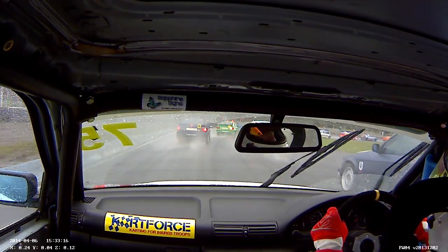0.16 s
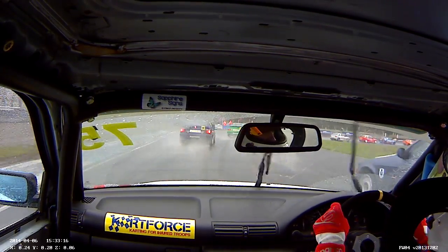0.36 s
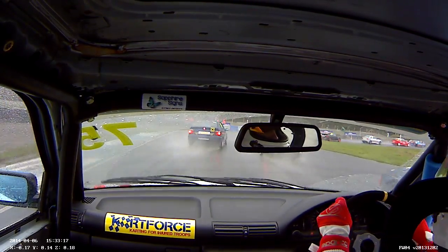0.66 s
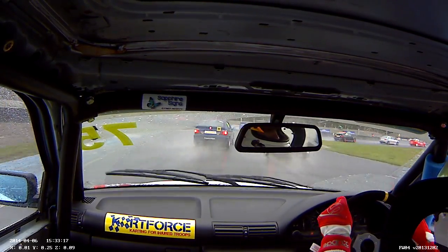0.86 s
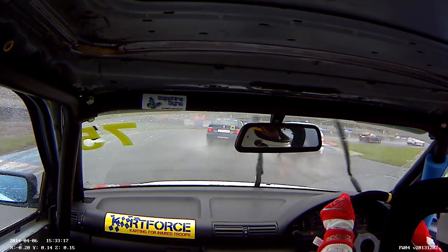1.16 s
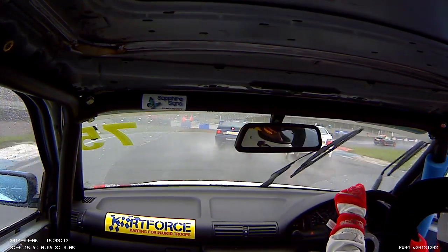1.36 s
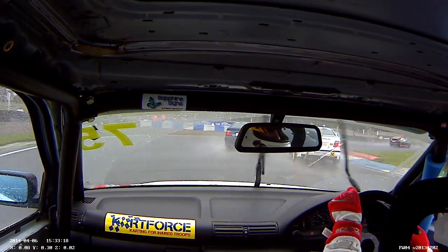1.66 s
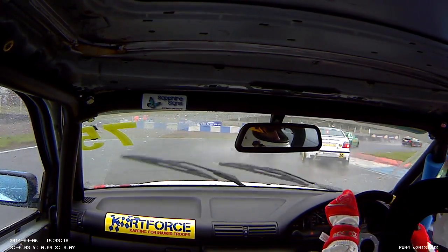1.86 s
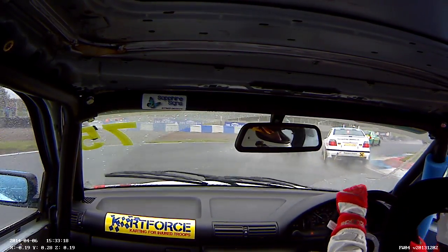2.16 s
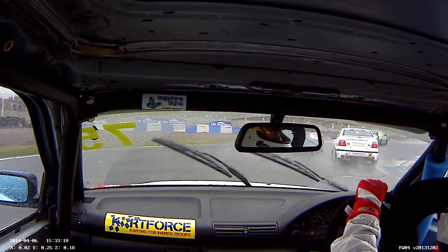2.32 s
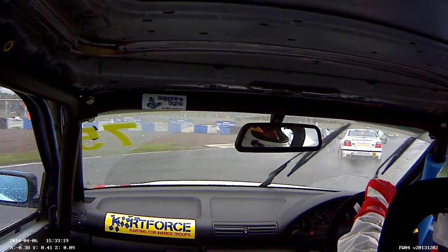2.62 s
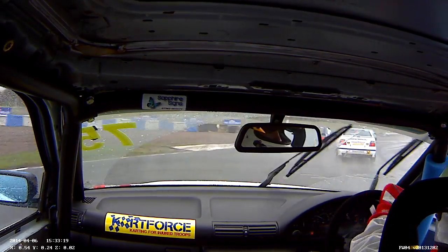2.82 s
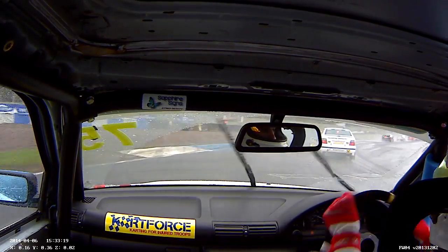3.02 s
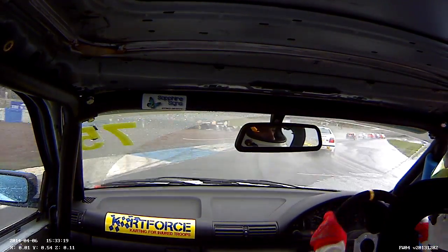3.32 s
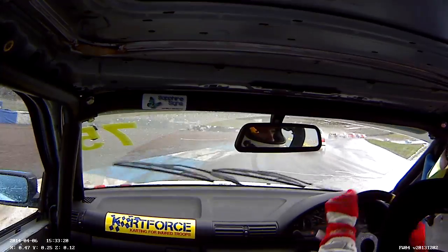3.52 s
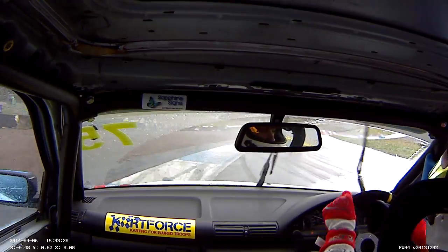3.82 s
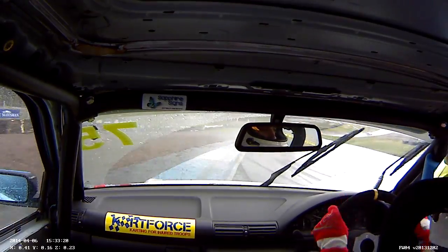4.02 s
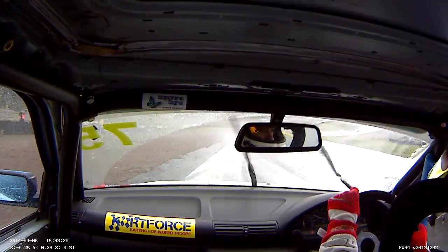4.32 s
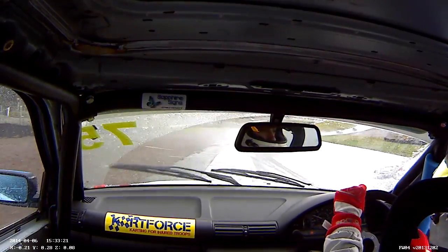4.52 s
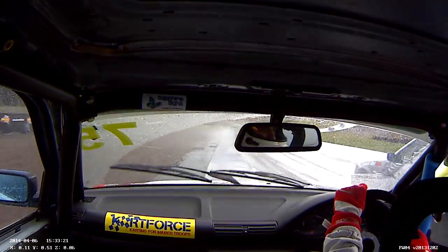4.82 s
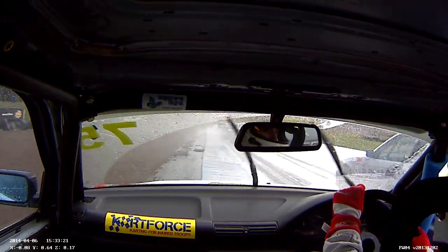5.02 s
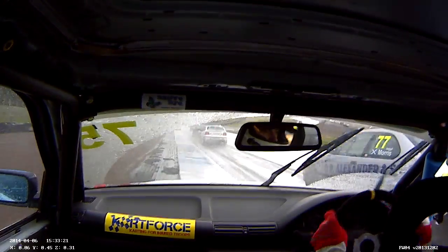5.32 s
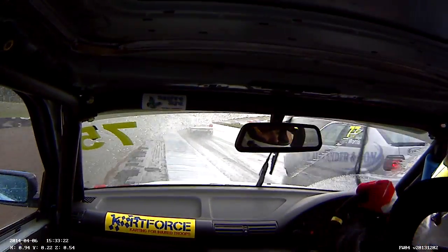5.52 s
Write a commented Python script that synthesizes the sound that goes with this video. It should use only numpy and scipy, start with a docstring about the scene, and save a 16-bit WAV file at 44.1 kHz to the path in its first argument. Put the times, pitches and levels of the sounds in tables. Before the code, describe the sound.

A race car engine slows and pulls away over rumbling, hissing wet tyres, heard from inside with knocks, rattles and sharp clicks.

```python
"""A racing engine drones over rumbling, hissing tyres, heard inside a stripped saloon on a wet circuit.
Its four cylinders slow into a bend, then pull away while a rival accelerates alongside and another car
drones further off. The road shakes the bare shell and the tyres fling water. Loose fittings rattle,
bumps knock the body, and near the end come several sharp clicks.
A small dashboard camera overloads on the loudest peaks."""
import sys
import numpy as np
from scipy import signal
from scipy.fft import rfft, irfft
from scipy.io import wavfile
from scipy.ndimage import uniform_filter1d

SR = 44100
rng = np.random.default_rng(int(sys.argv[2]) if len(sys.argv) > 2 else 0)


def to_wav(sig):
    """Store sig (one row per channel, or 1-D mono) as 16-bit WAV at the path in sys.argv[1].

    Samples outside -1..1 are clipped; the rate is SR.
    """
    pcm = np.clip(np.atleast_2d(sig), -1, 1) * 32767
    pcm = np.round(pcm).astype(np.int16)
    wavfile.write(sys.argv[1], SR, pcm.T)  # frames by channels


N = 250047

# How often our engine fires: it slows, holds, then climbs (time [s], firing rate [Hz])
FIRING_RATE = [(0.0, 151), (0.45, 139.6), (1.45, 120.5), (2.7, 99.37), (2.95, 90.8), (3.68, 89.2),
               (3.8, 99.1), (4.05, 98.1), (4.78, 107.6), (4.95, 115.7), (5.42, 126.2), (5.67, 139.3)]
CRUISE_HZ = 120  # the firing rate at cruising speed


def undb(db):
    """Turn decibels into a number to multiply by."""
    return 10 ** (np.asarray(db) / 20)


def unit(x):
    """Scale a signal to an average strength (rms) of 1."""
    return x / np.sqrt(np.mean(x ** 2))


def curve(table):
    """Join (time, value) points with straight lines, one value per sample."""
    return np.interp(np.arange(N) / SR, *np.transpose(table))


def colour(x, spectrum):
    """Shape a sound by (frequency [Hz], level [dB]) points, fading steeply outside them; strength 1."""
    hz, db = np.transpose(spectrum)
    f = np.maximum(np.arange(len(x) // 2 + 1) * SR / len(x), 1)
    edges = np.minimum(f / hz[0], 1) ** 6 * np.minimum(hz[-1] / f, 1) ** 12
    gain = undb(np.interp(np.log(f), np.log(hz), db))
    return unit(irfft(rfft(x) * edges * gain, len(x)))


def noise():
    """White noise: an even hiss."""
    return rng.standard_normal(N)


def wander(rate):
    """A smooth random wobble that heads for a new value `rate` times a second; strength 1."""
    hold = max(int(SR / rate), 1)
    steps = np.repeat(rng.standard_normal(N // hold + 1), hold)
    return unit(uniform_filter1d(uniform_filter1d(steps, hold), hold)[:N])


def grains(per_second, spread_db):
    """Tiny impacts at random moments, some larger than the rest; strength 1."""
    sizes = undb(spread_db * np.minimum(rng.exponential(size=N), 5))
    return unit((rng.random(N) < per_second / SR) * sizes * noise())


def since(start_s):
    """Seconds since a moment, zero before it."""
    return np.maximum(np.arange(N) / SR - start_s, 0)


def ramp(start_s, rise_s):
    """Climb from 0 to 1 and stay there."""
    return np.minimum(since(start_s) / rise_s, 1)


def burst(start_s, decay_s, rise_s=0.006):
    """Climb quickly to 1, then die away."""
    return ramp(start_s, rise_s) * np.exp(-since(start_s + rise_s) / decay_s)


def crank(hz, jitter):
    """A slightly uneven crankshaft: an angle (phase) that advances by 2 pi with each firing."""
    return 2 * np.pi * np.cumsum(hz * (1 + jitter * wander(40))) / SR


def engine_tone(phase, multiple, flutter):
    """One tone at a multiple of the firing rate, fluttering as the fuel burns unevenly."""
    tone = np.sqrt(2) * np.sin(multiple * phase + rng.uniform(0, 2 * np.pi))
    return tone * (1 + flutter * wander(22))


def engine():
    """The firing booms in the shell, unequal cylinders add in-between tones, and valves tick in step."""
    # How loudly the shell booms while coasting (firing rate [Hz], level [dB])
    shell_boom = [(90, -24), (102, -24), (112, -22), (120, -20), (126, -28.5), (135, -34), (150, -37)]
    # The other tones; four firings make a cycle, so they fall on quarter steps
    # (multiple of the firing rate, relative level coasting [dB], relative level under power [dB])
    tone_levels = [(.5, -0.5, -6), (.75, 7.5, -4), (1.5, -3, -3), (1.75, -0.5, -11.5), (2, -7, 6),
                   (2.5, 4, -8.5), (3, -16.5, 1.5), (3.5, -15, -8.5), (4, -7.5, -8.5), (4.5, -26.5, -16.5),
                   (5, -16, -28), (6, -17.5, -28.5), (7, -15.5, -19), (7.5, -23.5, -31), (8, -15, -17.5)]
    # Tone colour of the valves (frequency [Hz], relative level [dB])
    valve_colour = [(400, -7.5), (900, 6.5), (1200, -21.5), (1500, -15.5), (2000, -7), (2600, -30.0)]
    hz = curve(FIRING_RATE)
    throttle = ramp(start_s=3.695, rise_s=0.17)
    phase = crank(hz, jitter=0.0029)
    boom_db = np.interp(hz, *np.transpose(shell_boom)) + 5.5 * throttle
    boom = engine_tone(phase, 1, flutter=0.12) * undb(boom_db)
    tones = sum(engine_tone(phase, multiple, flutter=0.3) * undb(coast + throttle * (power - coast))
                for multiple, coast, power in tone_levels)
    tones_db = -48.5 + 6.5 * throttle + 3.5 * np.log2(hz / CRUISE_HZ)
    valves = colour(noise() * (1 + np.cos(phase)) ** 2, valve_colour)
    return boom + cabin(tones * undb(tones_db)) + valves * undb(-50 + 9.2 * throttle)


def cabin(x):
    """The air in the cabin rings at certain pitches and boosts tones that sweep through them."""
    # Where the air rings (frequency [Hz], width [Hz], boost [dB])
    resonances = [(299.6, 15, 5), (378, 23, 2), (486, 22, 2), (584, 10, 13.5), (749.5, 24, 13.5),
                  (834, 20, 4), (875, 16, 5)]
    f = np.arange(N // 2 + 1) * SR / N
    boost_db = sum(db / (1 + (2 * (f - hz) / width) ** 2) for hz, width, db in resonances)
    return irfft(rfft(x) * undb(boost_db), N)


def road_level(law):
    """A road noise's level in dB: it grows on rough track and shifts with speed, set by the engine."""
    # The track is smooth until the first bump, then coarser (time [s], roughness [0-1])
    roughness = [(2.6, 0), (2.8, 0.45), (4.0, 0.39), (5.05, 0.69), (5.67, 0.93)]
    cruise_db, speed_db, rough_db = law
    speed_doublings = np.log2(curve(FIRING_RATE) / CRUISE_HZ)
    return cruise_db + speed_db * speed_doublings + rough_db * curve(roughness)


def road():
    """The road shakes the shell; tyres roar through water and fling droplets at the wheel arches."""
    # Tone colour of each noise (frequency [Hz], relative level [dB])
    rumble_colour = [(8, -9.5), (17, 4.5), (27, -5.5), (45, -5.5), (70, -6.5), (100, -11.5), (150, -22.5),
                     (220, -37.5)]
    drone_colour = [(90, -11.5), (140, 8), (175, 0.5), (212, 5), (245, -3.5), (290, 3), (330, -5),
                    (375, -1.5), (420, -15), (470, -6.5), (560, -18)]
    roar_colour = [(260, -32.5), (450, 2), (482, 1.5), (508, -9.5), (562, 0.5), (714, -4.5), (769, 1),
                   (803, -3.5), (878, 3.5), (951, -1), (1010, -1.5), (1170, -1), (1270, -12), (1340, -18),
                   (1600, -16), (2080, -51.5), (3520, -120)]
    spray_colour = [(760, -31), (1300, -7), (1380, -12), (1720, -6.5), (2010, 1), (2370, -9), (2710, -7),
                    (2990, -12.5), (3280, -10.5), (3620, -2.5), (3990, -9.5), (4350, -0.5), (4900, -1),
                    (5630, -5), (6300, -22.5), (8190, -52.5), (13900, -120)]
    fine_spray_colour = [(5800, -27), (6300, -3), (6800, 5), (7300, -0.5), (8000, -19), (9000, -33.5)]
    # How loud each noise is
    # (cruising on smooth track [dB], change per doubling of speed [dB], added at full roughness [dB])
    rumble_law = (-27.5, -2, 14.3)
    drone_law = (-35.5, -4.5, 5.6)
    roar_law = (-39, 7.2, 6.7)
    spray_law = (-41, 4, 2.3)
    # Dips in the track that make the shell rumble for a moment (time [s], level [dB])
    dips = [(.12, -26), (1.65, -23), (2.78, -18), (3.45, -21), (4.25, -19), (5.08, -11.5)]
    t = np.arange(N) / SR
    swells = sum(undb(db) * np.exp(-((t - s) / 0.12) ** 2) for s, db in dips)
    rumble = colour(noise(), rumble_colour) * np.hypot(undb(road_level(rumble_law)), swells)
    drone = colour(noise(), drone_colour) * undb(road_level(drone_law) + 3.0 * wander(12))
    roar = colour(noise(), roar_colour) * undb(road_level(roar_law) + 0.55 * wander(11))
    droplets = grains(per_second=16000, spread_db=0.3)
    spray = colour(droplets, spray_colour) + undb(-21) * colour(droplets, fine_spray_colour)
    return rumble + drone + roar + spray * undb(road_level(spray_law) + 0.67 * wander(28))


def panels():
    """Bare sheet metal, shaken at random by the road, sings faintly at its own pitches."""
    # The panels' notes (frequency [Hz], width [Hz], level [dB])
    notes = [(914, 22, -51.5), (1016, 9.7, -49), (1140, 5.3, -56.5), (1238, 5.3, -57.5), (1917, 8.7, -56.5),
             (2056, 6.3, -57)]
    shake = noise()
    return sum(undb(db) * unit(signal.lfilter(*signal.iirpeak(hz, hz / width, fs=SR), shake))
               for hz, width, db in notes)


def rattles():
    """Loose fittings rattle and water splashes against the shell, making showers of small taps, some deep and
    full, others thin and bright."""
    # Tone colour of the taps (frequency [Hz], relative level [dB])
    tap_colour = [(300, -9), (900, 8.5), (1500, -5), (2050, 7.5), (2450, -6.5), (3000, -8.5), (3650, -2.5),
                  (4050, -1), (4600, 5.5), (5500, 3.5), (6200, -8.5), (7000, -8.5), (8000, -26),
                  (9000, -34)]
    # Showers of taps (time [s], level [dB], fade time [s], change to the low part [dB])
    showers = [(.342, -36.5, .016, -5), (.79, -34, .014, -10), (2.311, -36.5, 0.026, -2),
               (2.528, -34.5, 0.021, -8), (2.703, -22, 0.019, 4.5), (2.726, -27.5, 0.04, 9.5),
               (3.142, -25, .033, -9), (3.688, -33.5, 0.075, -1.5), (4.069, -29.5, 0.061, -6),
               (4.181, -28, 0.046, -13), (4.477, -30, 0.072, -14), (4.641, -33.5, 0.07, -10),
               (4.868, -33, .036, -16)]
    chatter = colour(grains(per_second=6000, spread_db=2.0), tap_colour)
    lows = signal.sosfiltfilt(signal.butter(2, 2800, fs=SR, output="sos"), chatter)
    highs = chatter - lows
    return sum(undb(db) * burst(s, decay) * (highs + undb(low_db) * lows)
               for s, db, decay, low_db in showers)


def bumps():
    """A bump sets the whole body booming and swings its heavy parts for a few cycles."""
    # Tone colour of the booming body (frequency [Hz], relative level [dB])
    body_colour = [(40, 4), (90, 4), (140, -1), (200, -1), (290, -5), (380, -5.5), (520, -15), (700, -18),
                   (810, -13.5), (1000, -16.5), (1500, -24), (2200, -35), (4000, -49)]
    # Knocks to the body (time [s], level [dB], fade time [s])
    knocks = [(2.666, -20, 0.043), (2.704, -14, 0.057), (3.078, -11.5, 0.051), (4.972, -18.5, 0.062)]
    # Swings of the shell on its springs, or of the stiffer floor
    # (time [s], frequency [Hz], peak level [dB], time to the peak [s])
    swings = [(2.665, 33.1, 2.5, 0.017), (3.077, 130, -13.5, 0.02), (5.222, 17.1, -4, 0.025)]
    out = colour(noise(), body_colour) * sum(undb(db) * burst(s, decay) for s, db, decay in knocks)
    for s, hz, db, peak_s in swings:
        t = since(s)
        swell = (t / peak_s * np.exp(1 - t / peak_s)) ** 2
        out -= undb(db) * swell * np.sin(2 * np.pi * hz * t)
    return out


def passing_car(car, jitter, flutter):
    """A car speeds up evenly, sounding weaker with distance; gives its firing tone and its phase."""
    nearest_s, hz, climb, db, fade_s = car
    t = np.arange(N) / SR - nearest_s
    phase = crank(hz + climb * t, jitter)
    return engine_tone(phase, 1, flutter) * undb(db) / np.hypot(1, t / fade_s), phase


def other_cars():
    """Two exhausts heard through the doors as they leave the bend: one close and harsh, one a drone."""
    # Each car (time when nearest [s], firing rate then [Hz], climb [Hz per s],
    # level then [dB], time to fall by 3 dB [s])
    rival = (5.5, 199.5, 32.5, -20, 0.18)
    far_car = (5, 191, 22, -27, 0.6)
    # Tones in the rival's rasp (multiple of the firing rate, relative level [dB])
    rasp_tones = [(2, 4), (2.75, -7), (3, -1), (3.75, -10), (4, 0.5), (4.25, -9.5), (4.75, -1.5), (5, 1),
                  (6, -10.5)]
    near, phase = passing_car(rival, jitter=0.0022, flutter=0.06)
    rasp = sum(engine_tone(phase, multiple, flutter=0.34) * undb(db) for multiple, db in rasp_tones)
    # The rasp flares as the rival's pipe turns towards the cabin, holds, then fades.
    flare = ramp(start_s=4.19, rise_s=0.32) * np.exp(-since(5.06) / 0.7)
    far, _ = passing_car(far_car, jitter=0.0034, flutter=0.067)
    return (near + far) * ramp(start_s=3.65, rise_s=0.18) + cabin(rasp * undb(-41) * flare)


def clicks():
    """Sharp clicks close to the camera ring briefly, some duller and some brighter."""
    # Each click (time [s], strength [dB], pitch above which it rings weakly [Hz])
    hits = [(4.804, -15, 2800), (4.924, -10.5, 2800), (4.981, -9, 2780), (5.059, -20.5, 4500),
            (5.162, -16, 3000), (5.248, -13, 3181), (5.634, -11, 3440), (5.644, -0.5, 9000),
            (5.647, -10, 7020)]
    # The pitches at which each click rings (frequency [Hz], relative level [dB], time to fade 60 dB [s])
    pitches = [(2125, -13.5, 0.024), (2870, -21.5, 0.024), (3660, -11, 0.018), (4680, -1, 0.013),
               (5180, -2.5, 0.016), (5630, -19.5, 0.033), (7170, -18, 0.011)]
    t = np.arange(SR // 20) / SR
    out = np.zeros(N + len(t))
    for s, hit_db, limit_hz in hits:
        start = int(s * SR)
        for hz, db, ring_s in pitches:
            size = undb(hit_db + db) * np.exp(-(hz / limit_hz) ** 2)
            fade = np.exp(-np.log(1000) * t / ring_s)
            out[start:start + len(t)] += size * np.sin(2 * np.pi * hz * t) * fade
    return out[:N]


def scene():
    """Everything that reaches the dashboard, in one channel."""
    return (engine() + road() + panels() + rattles() + bumps() + other_cars() + clicks())[None]


def record(dry):
    """The camera's microphone loses the highest treble, then its circuit flattens the loudest peaks."""
    mic_hz, ceiling, top_hz = 8247, 0.72, 15700
    heard = signal.sosfilt(signal.butter(12, mic_hz, fs=SR, output="sos"), dry)
    flattened = heard / (1 + (heard / ceiling) ** 12) ** (1 / 12)
    return signal.sosfilt(signal.butter(12, top_hz, fs=SR, output="sos"), flattened)


dry = scene()
out = record(dry)
to_wav(out)
```